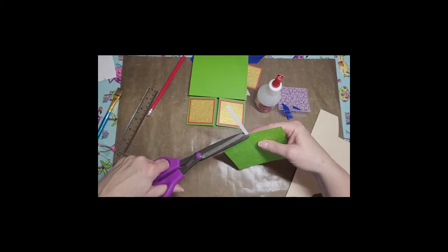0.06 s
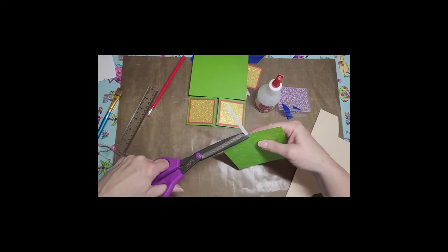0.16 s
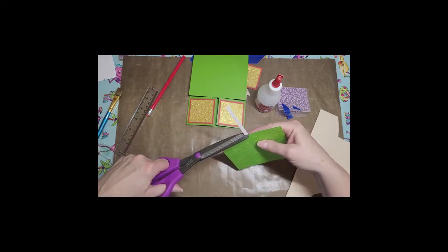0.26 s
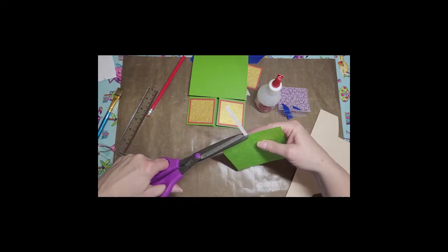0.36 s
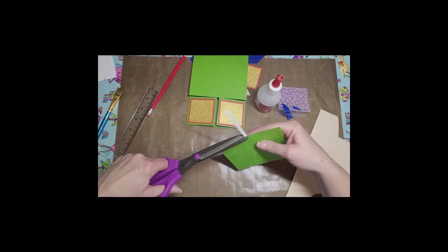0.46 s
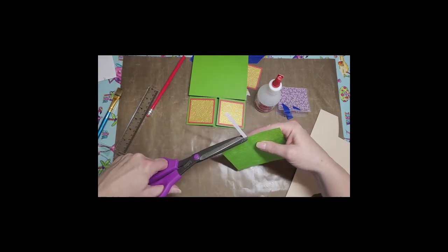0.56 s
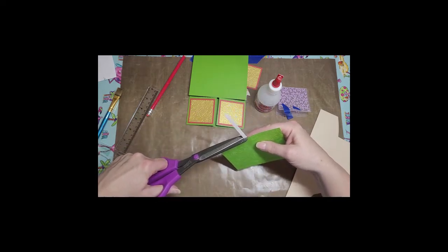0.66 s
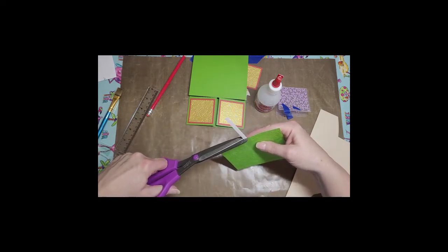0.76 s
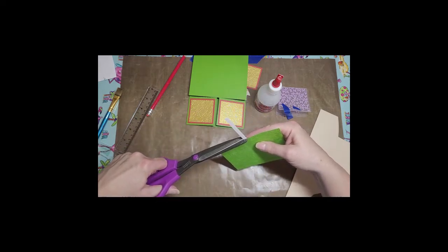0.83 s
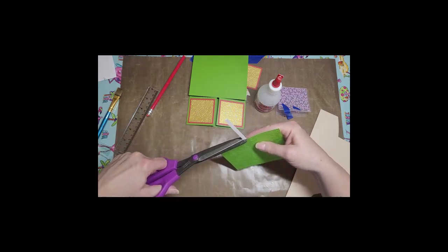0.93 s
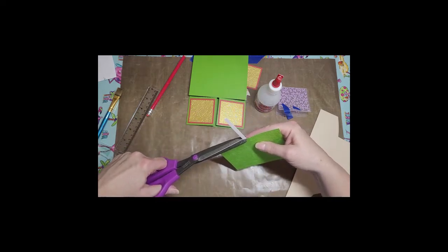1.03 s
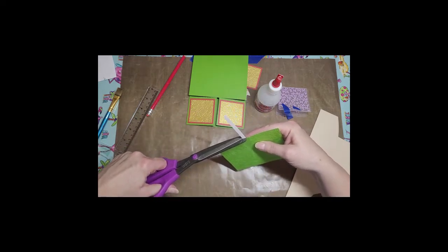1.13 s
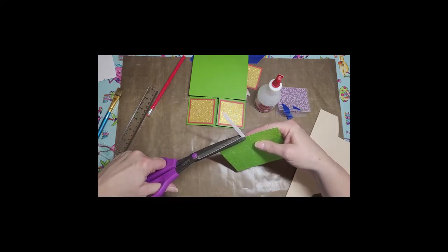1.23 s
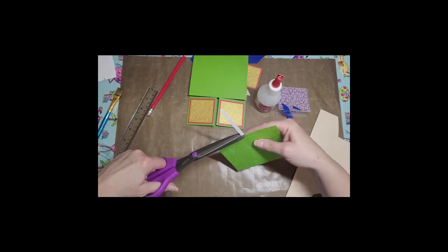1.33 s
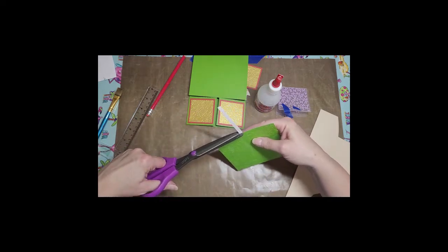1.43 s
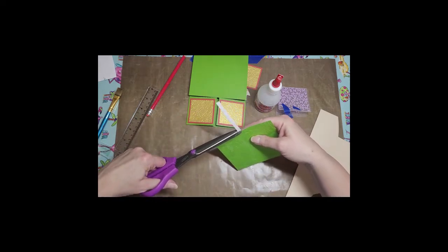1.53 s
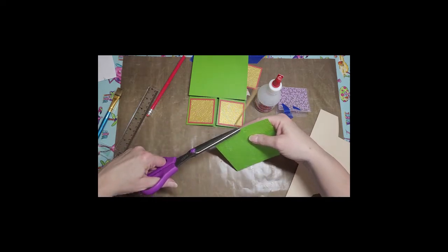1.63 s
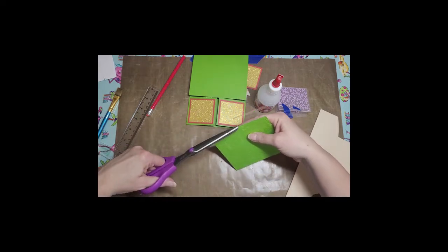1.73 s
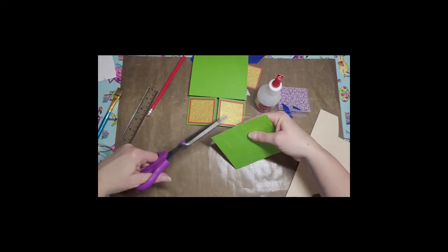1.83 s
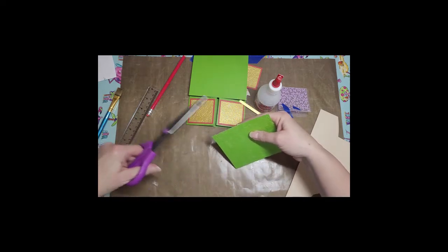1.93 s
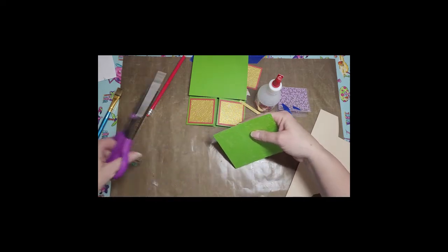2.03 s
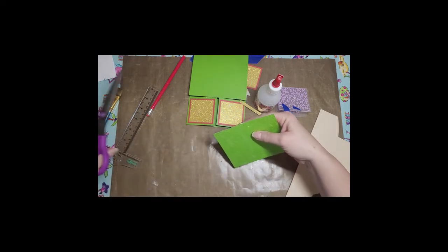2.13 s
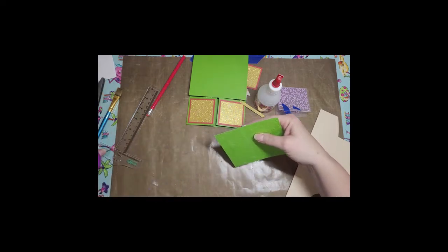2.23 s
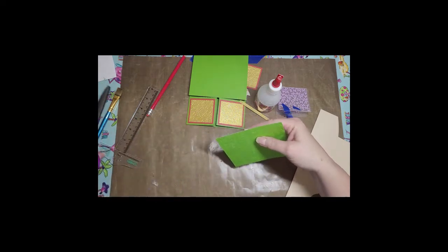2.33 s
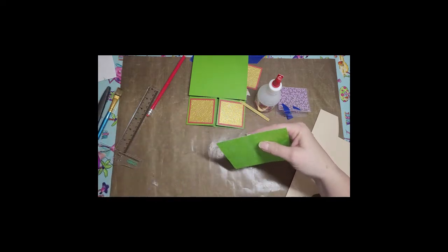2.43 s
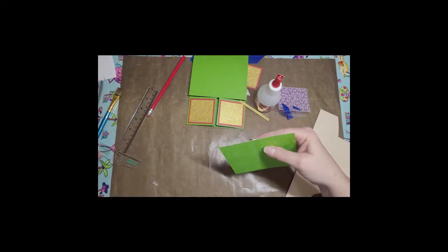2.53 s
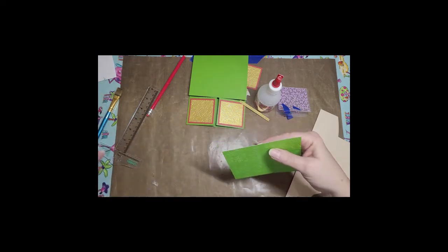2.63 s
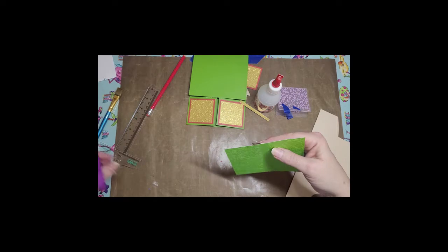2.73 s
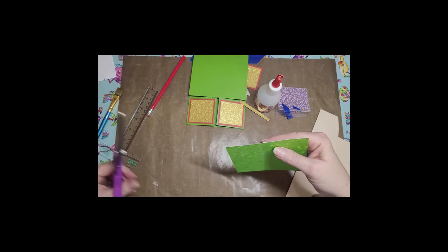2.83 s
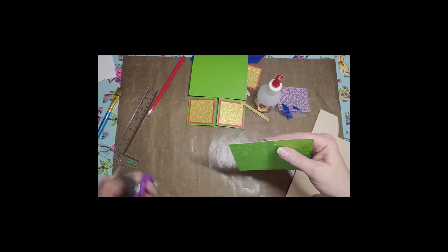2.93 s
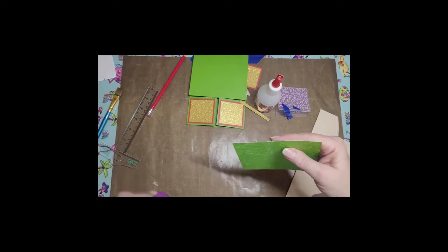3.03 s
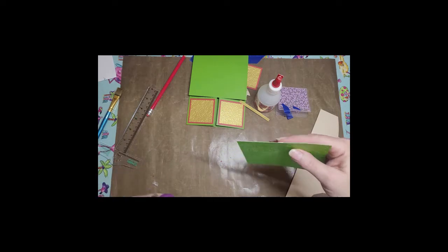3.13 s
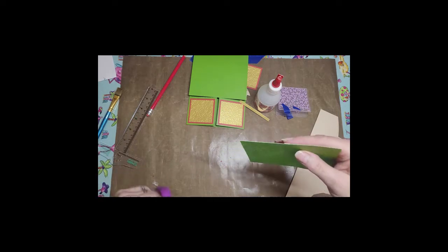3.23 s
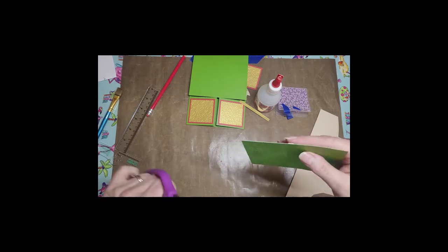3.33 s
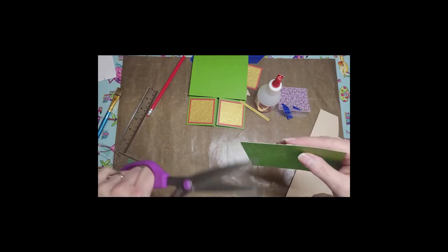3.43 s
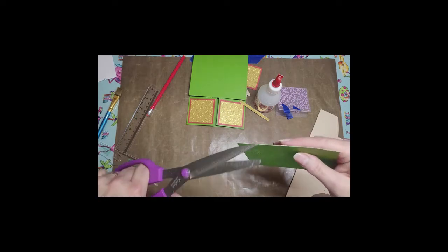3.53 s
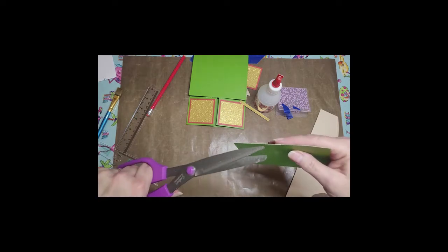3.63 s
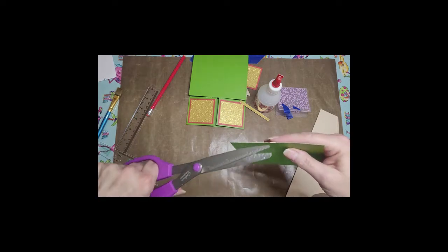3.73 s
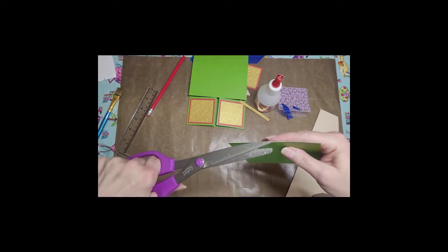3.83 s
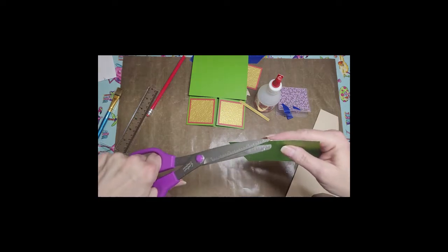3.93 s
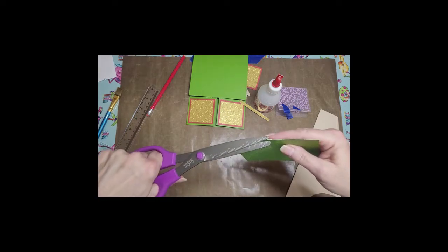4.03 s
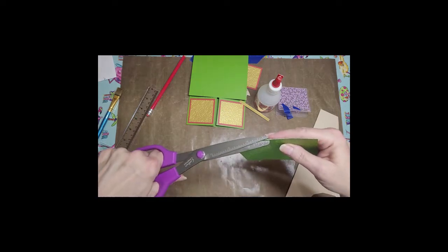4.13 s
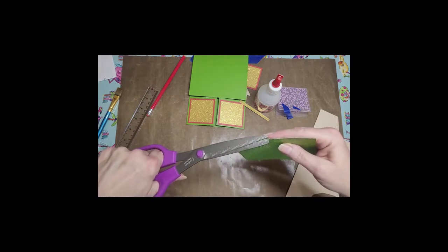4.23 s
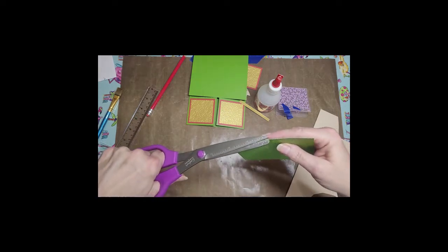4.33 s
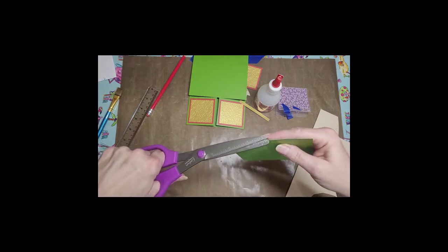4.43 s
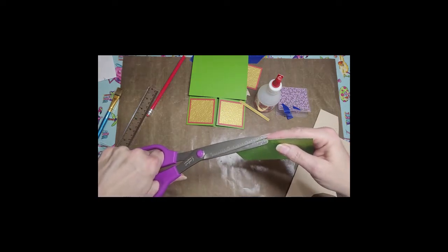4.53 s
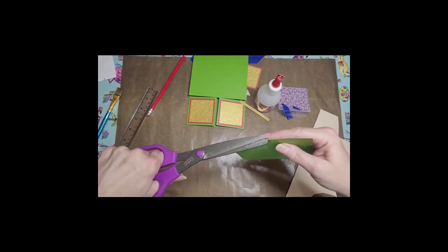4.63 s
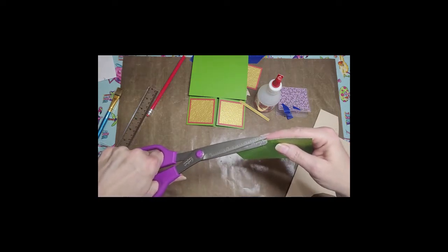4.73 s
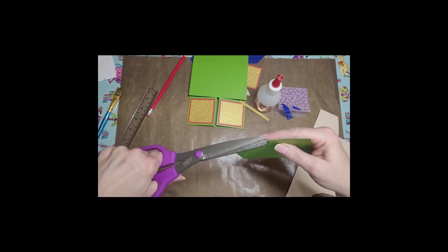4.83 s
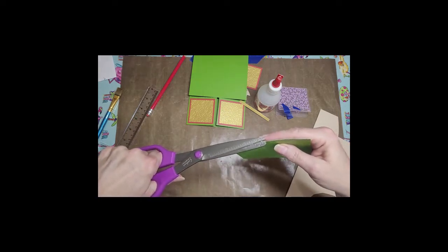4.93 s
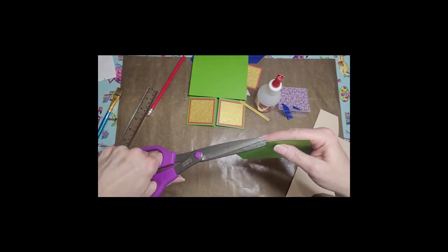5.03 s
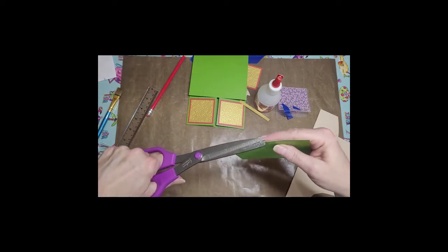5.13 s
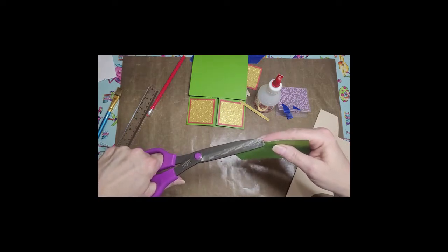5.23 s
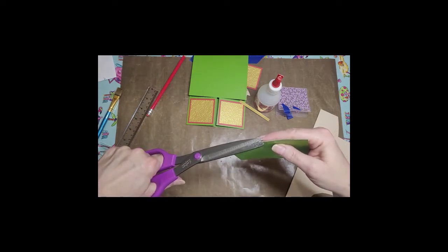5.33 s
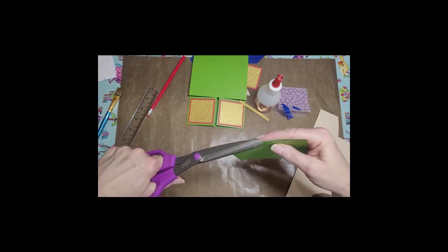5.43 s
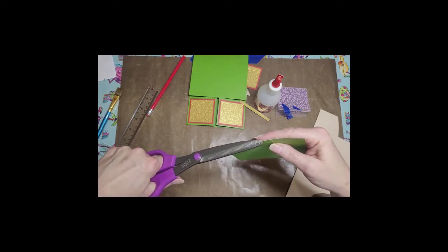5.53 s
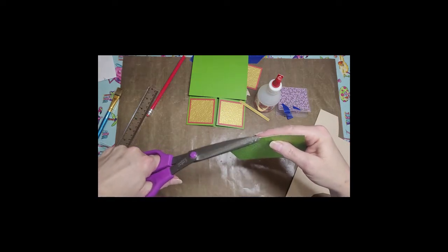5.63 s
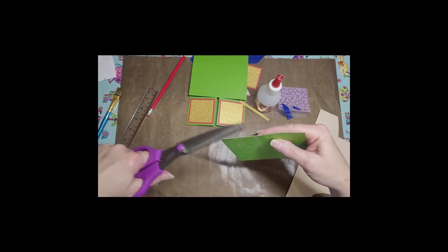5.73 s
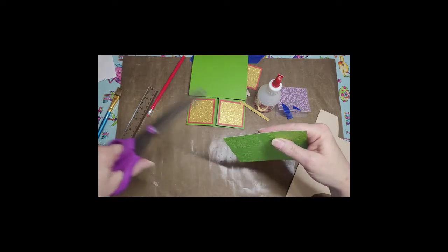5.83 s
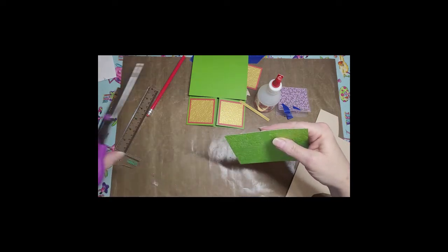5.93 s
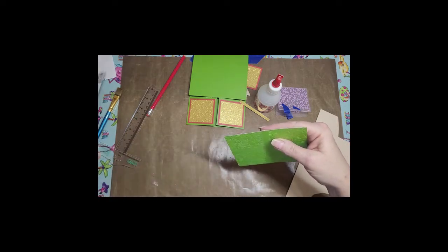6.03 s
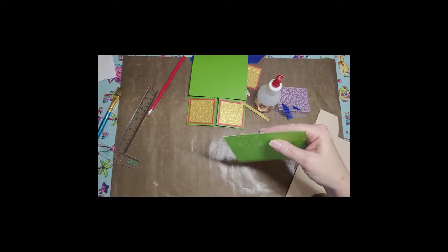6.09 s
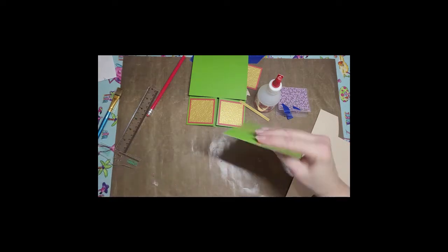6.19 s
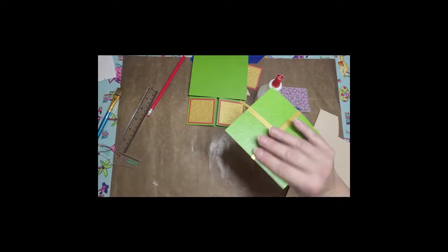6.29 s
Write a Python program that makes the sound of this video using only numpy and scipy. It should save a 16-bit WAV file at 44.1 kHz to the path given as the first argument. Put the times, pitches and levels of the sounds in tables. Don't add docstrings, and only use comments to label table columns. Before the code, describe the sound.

Two loud, steely scissor snips through stiff card, separated by a low table knock and dry card flicks, in a quiet hard-walled room.

```python
import sys
import numpy as np
from scipy import signal
from scipy.fft import rfft, irfft, next_fast_len
from scipy.io import wavfile
from scipy.ndimage import uniform_filter1d

SR = 44100
rng = np.random.default_rng(int(sys.argv[2]) if len(sys.argv) > 2 else 0)


def ratio(d):
    e = np.asarray(d, float) / 20
    return 10 ** e


def inscribe(sig):
    pcm = np.round(np.clip(np.atleast_2d(sig).T, -1, 1) * 32767)
    wavfile.write(sys.argv[1], SR, pcm.astype(np.int16))


N = 280460
TIME = np.arange(N) / SR

# (time [s], bright level [dB], middle over bright [dB], room level [dB])
SNIPS = [
    (1.5796, -7.5, -10.5, 1.5),
    (1.8345, -37.5, -11.5, 1.5),
    (5.4583, -10, -5, -4),
    (5.5466, -50, -9, -11),
]
OFFCUT = [(1.8477, -39, 7.5, -6.5), (1.8547, -56.5, 20, -7), (1.865, -62, 15.5, -6.5),
          (1.899, -40.5, -10, -7), (1.9466, -42.5, -5.5, -5), (2.015, -57.5, -10.5, 0.5),
          (5.576, -65.5, 6, -1)]
LAID = [
    (2.343, -63.5, -14, -6.5),
    (2.3768, -43, -6.5, -0.5),
    (2.4058, -57, -0.5, -0.5),
    (2.4182, -42, -10.5, -10),
]
FLICKS = [(2.685, -52.5, -3.5, -6), (2.726, -49, -25, -11), (2.91, -53, -16, 7), (2.9553, -56, -18.5, -16),
          (3.255, -56.5, -3, 1), (3.333, -44, -25, -9), (3.336, -37.5, -34, -19),
          (3.5373, -64.5, -9.5, -9.5), (5.909, -68, -12, -3.5)]
GRIPS = [(4.1253, -78.5, -3, -1), (4.161, -68.5, -5, 1), (4.2087, -74.5, -8, -5), (4.3827, -75, 0, 0.5),
         (6.1834, -68, -11.5, 8.5)]
DROPPED = [
    (6.2952, -45.5, -6.5, -9),
    (6.328, -53, -6.5, -4.5),
    (6.344, -54, -8.5, -8),
]
# (dull over middle [dB], dull pitch [Hz])
THING_BOOM = [
    (-11.5, 2400),
    (-5.5, 2930),
    (2, 1100),
    (-16.5, 810),
    (5, 930),
    (-27, 760),
]

# (pitch [Hz], width [Hz], level [dB])
BLADE_MODES = [(1870, 340, -5.5), (2650, 250, -2), (4700, 130, -4), (6660, 350, -8), (7500, 200, 3.5),
               (9560, 490, 4.5), (11360, 600, 1), (13935, 700, 0.5)]
# (frequency [Hz], level [dB per Hz])
CARD_COLOUR = [(290, -51), (500, -21), (710, -24.5), (1050, -12.5), (1480, -15.5), (2610, -16.5),
               (3250, -14), (4830, -8), (5350, -9.5), (6760, -3), (8300, -10), (9330, -9), (11600, -0.5),
               (15100, 1.5), (16500, -25.5)]
# (low edge [Hz], high edge [Hz])
BANDS = [(8600, 20000), (3400, 8600), (250, 3400)]
# (frequency [Hz], time to fall 60 dB [s])
WALLS = [(100, 0.5), (500, 0.24), (1200, 0.2), (4000, 0.24), (10000, 0.22), (16000, 0.16)]

# (peak time [s], peak level [dB], rise [dB/s], fall [dB/s], middle over bright [dB])
SHEARS = [(1.26, -82, 300, 170, -16), (1.366, -79.5, 152, 15, -13.5), (1.534, -60, 403, 898, -21),
          (1.569, -48, 1200, 1502, -15.5), (5.424, -74.5, 129.5, 600, -11.5),
          (5.447, -49, 1150, 1500, -20.5)]
SLIDES = [(2.645, -68, 120, 146, -6.5), (2.686, -62.5, 3000, 590, 7), (2.722, -63, 900, 166, -10.5),
          (2.912, -60, 3000, 220, -13.5), (2.942, -54, 500, 520, -17.5), (2.99, -66.5, 300, 28, -12.5),
          (3.26, -54, 920, 245, -10.5), (3.334, -60, 1000, 900, -14.5), (3.356, -76.5, 400, 104, -16),
          (3.544, -77.5, 150, 79, -9), (5.998, -77, 44.8, 91, -10.5), (6.136, -77.5, 400, 460, -9),
          (6.196, -72, 800, 8, 0)]
FIDGETS = [(4.126, -89, 900, 540, -10), (4.162, -87, 1700, 260, -4), (5.2, -94, 690, 120, -5),
           (5.8, -85, 78, 130, -40), (7.2, -83.5, 93, 20, -34)]
STROKE_DULL_DB = [-5.5, -9.5, 17]

# (time [s], peak level [dB], pitch [Hz], room level [dB])
CREAKS = [(0.167, -69.5, 7290, 13), (0.1857, -70.5, 7400, 8), (0.4279, -70.5, 7320, 15),
          (1.947, -53.5, 7350, -5.5), (2.0153, -67.5, 7420, 4.5), (2.1211, -65, 7400, 9.5),
          (4.1589, -70, 6940, 9), (4.1814, -75.5, 6770, 7.5)]
TAPS = [(1.947, -44, 4500, -3.5), (2.377, -42, 5300, -3), (2.406, -39.5, 4600, -2),
        (2.4169, -48, 4700, -11), (3.335, -52, 4990, -11), (6.2948, -47, 5130, 4), (6.327, -50, 4940, -5.5),
        (6.3455, -52.5, 4490, -6)]
BOOMS = [(1.58, -46, 370, -2), (1.58, -39, 1050, 3), (1.8478, -60, 330, -3), (1.85, -46, 1750, 8),
         (2.6845, -67, 1000, 7), (4.1253, -73, 600, -1), (4.1606, -74.5, 1150, -3), (4.3818, -69, 600, 0),
         (5.4582, -56, 330, -3.5), (5.4582, -38.5, 2660, 2.5), (5.575, -62.5, 1090, -3),
         (5.4582, -35, 3900, -3), (1.58, -50, 1770, 4), (2.6845, -61.5, 2700, 0.5),
         (6.186, -73.5, 550, 5.5)]

# (time [s], peak level [dB])
KNOCKS = [(1.578, -56), (2.374, -29.5), (2.389, -33.5), (2.406, -34), (2.417, -36), (5.457, -58.5),
          (6.293, -37.5), (6.31, -42.5), (6.328, -40.5), (6.345, -46)]
# (pitch [Hz], level [dB], time to fall 60 dB [s])
TABLE_MODES = [(62, -9, 0.38), (100, -11, 0.2), (128.45, -2, 0.18), (187, -8.5, 0.16), (237.3, -1.5, 0.34),
               (313, -4.5, 0.15), (610, -19.5, 0.13)]
# (frequency [Hz], level [dB per Hz])
THUD_COLOUR = [(35, -39.5), (60, -10), (117, 1), (237, -7.5), (401, -22.5), (603, -13.5), (810, -24.5),
               (879, -44), (1110, -30.5), (3000, -54), (3900, -76), (6600, -120)]
# (time [s], peak level [dB])
SWAYS = [
    (2.4, -53),
    (6.3, -51.5),
    (6.33, -44),
]

# (time [s], pitch [Hz], level [dB])
GROAN = [(2.53, 132.1, -78), (2.58, 141.4, -74.5), (2.82, 147.6, -73), (2.92, 141.5, -68.5),
         (2.96, 141, -79.5), (3.2, 133, -78), (3.24, 133, -83), (3.46, 140.4, -87)]
# (peak time [s], peak level [dB], rise [dB/s], fall [dB/s])
DRAG = [(2.56, -71, 59.5, 40.5), (2.714, -70, 199, 228), (2.87, -72, 302, 98)]
# (time [s], pitch [Hz], level [dB])
SQUEAK = [(2.12, 1497, -100), (2.3, 1520, -74.5), (2.38, 1504, -82), (2.486, 1484, -83.5),
          (2.6, 1514, -100)]

# (frequency [Hz], level [dB per Hz])
AIR_COLOUR = [(15, -36), (25, -9.5), (54, 0), (208, -14.5), (237, -6), (264, -11), (301, -3.5), (335, -15),
              (425, -12), (511, -18), (1230, -26), (1560, -26.5), (7610, -33.5), (14000, -28)]
# (frequency [Hz], likeness [-1 to 1])
ALIKE = [(60, 0.58), (180, 0.76), (550, 0.25), (1650, -0.16), (4970, -0.02), (15000, -0.14)]
HUM_HZ = [48.4, 241, 11908]
# (width [Hz], level [dB])
HUM = [(18.93, -86), (5.95, -90), (25, -104)]


def unit(x):
    return x / np.sqrt(np.mean(x ** 2, axis=-1, keepdims=True) + 1e-20)


def along(points, hz):
    point_hz, value = np.transpose(points)
    return np.interp(np.log(hz + 1), np.log(point_hz + 1), value)


def filtered(x, response):
    n = x.shape[-1]
    padded = next_fast_len(n + 8192)
    hz = np.fft.rfftfreq(padded, 1 / SR)
    return irfft(rfft(x, padded) * response(hz), padded)[..., :n]


def peak(hz, centre_hz, width_hz):
    push = 1j * hz * width_hz
    return push / (centre_hz ** 2 - hz ** 2 + push)


def add(track, s, x):
    part = track[:, round(s * SR):]
    part[:, :x.shape[1]] += x[:, :part.shape[1]]


def level_curve(s, db):
    fade = np.clip(np.minimum(TIME - s[0], s[-1] + 0.018 - TIME) / 0.026, 0, 1)
    return fade * ratio(np.interp(TIME, s, db))


def stroke(s, db, rise, fall):
    return ratio(db - np.where(TIME < s, rise * (s - TIME), fall * (TIME - s)))


def room(x, gap_s=.003, stretch=1):
    hz, t, z = signal.stft(rng.standard_normal((2, SR // 2)), SR, nperseg=256)
    fall = ratio(-60 * t / stretch / along(WALLS, hz)[:, None])
    tail = signal.istft(z * fall, SR, nperseg=256)[1]
    tail = tail * (1 - np.exp(-np.arange(tail.shape[1]) / SR / gap_s))
    return signal.fftconvolve(np.atleast_2d(x), tail / np.linalg.norm(tail[0]), axes=1)


def banded(x):
    def colour(hz):
        steel = 1 + sum(ratio(db) * np.abs(peak(hz, c, w)) ** 2 for c, w, db in BLADE_MODES)
        return ratio(along(CARD_COLOUR, hz)) * steel

    def band(hz, low, high):
        return 1 / (1 + (low / (hz + 1)) ** 10) / (1 + (hz / high) ** 10)

    return [filtered(x, lambda hz: colour(hz) * band(hz, low, high)) for low, high in BANDS]


def snap(out, s, bright_db, tilt_db, room_db, boom_db, dull_hz):
    start_s, left_lag, onset_s = .004, 2, 0.00045
    t = np.arange(1024) / SR - start_s
    pulse = 1. * (np.arange(len(t)) == np.argmax(t >= 0))
    own, shared = rng.standard_normal((2, len(t))), rng.standard_normal(len(t))
    noise = .8 * own + np.array([np.roll(shared, left_lag), shared])
    crack = noise * (t >= 0) * (ratio(-60 * t / 0.0086) + .12 * ratio(-60 * t / .03))
    bright, middle, dull = banded(np.vstack([crack, pulse]))
    dull = filtered(dull, lambda hz: .55 + np.abs(peak(hz, dull_hz, .6 * dull_hz)))

    middle_db = bright_db + tilt_db
    levels = ratio([bright_db + 4, middle_db + 3, middle_db + boom_db + .5])
    parts = [g * b / np.abs(b[1]).max() for g, b in zip(levels, (bright, middle, dull))]
    onset = np.exp(np.minimum(t, 0) / onset_s)
    add(out, s - start_s, sum(parts)[:2] * onset * ratio([[.8], [2.8]]))

    even = sum(ratio(db) * b[2] * np.linalg.norm(b[1]) / np.linalg.norm(b[2])
               for db, b in zip((-1.6, 1.2, 3.2), parts))
    add(out, s - start_s, ratio(room_db + 1) * room(even))


def snaps():
    out = np.zeros((2, N))
    things = (SNIPS, OFFCUT, LAID, FLICKS, GRIPS, DROPPED)
    for hits, (boom_db, dull_hz) in zip(things, THING_BOOM):
        for hit in hits:
            snap(out, *hit, boom_db, dull_hz)
    return out


def rubs():
    unevenness = ratio(4.1 * unit(uniform_filter1d(rng.standard_normal(N), 40)))
    grains = rng.standard_normal((2, N)) * unevenness
    level = np.zeros((3, N))
    for strokes, dull_db in zip((SHEARS, SLIDES, FIDGETS), STROKE_DULL_DB):
        for s, db, rise, fall, middle_db in strokes:
            level += stroke(s, db, rise, fall) * ratio([[0], [middle_db], [middle_db + dull_db]])
    direct = sum(g * ratio(-5.5) * unit(b) for g, b in zip(level, banded(grains)))
    return direct * ratio([[-1.5], [1.5]]) + ratio(-7.5) * room(direct[0])[:, :N]


def pings(rows, width_hz, low_db):
    out, t = np.zeros((2, N)), np.arange(2048) / SR
    for s, db, ring_hz, room_db in rows:
        slip = rng.standard_normal(len(t)) * ratio(-60 * t / 0.008)
        ring = filtered(slip, lambda hz: peak(hz, ring_hz, width_hz) - ratio(low_db) * peak(hz, 1860, 180))
        ring = ratio(db - 3) * ring / np.abs(ring).max()
        add(out, s, np.array([ring, ring]))
        add(out, s, ratio(room_db - 1) * room(ring))
    return out


def knocks():
    out, t = np.zeros((2, N)), np.arange(SR // 2) / SR
    sides = np.array([[1], [-1]])
    onset = 1 - np.exp(-t / 0.00085)
    for s, db in KNOCKS:
        ring = 0
        for (hz, mode_db, t60), luck in zip(TABLE_MODES, rng.standard_normal((len(TABLE_MODES), 3))):
            gain = ratio(mode_db + 2.1 * luck[0] - 60 * t / t60)
            ring = ring + gain * np.sin(2 * np.pi * hz * t + 3 * luck[1] + 0.2 * luck[2] * sides)
        noise = rng.standard_normal(len(t)) + 0.3 * rng.standard_normal((2, len(t)))
        thud = unit(filtered(noise, lambda hz: ratio(along(THUD_COLOUR, hz)))) * ratio(1 - 60 * t / .2)
        add(out, s + 0.0032, ratio(db - 9) * (ring + thud) * onset * ratio([[-.8], [.8]]))
    return out


def sway():
    sway_hz, t60_s, rise_s = 56, .5, 0.0089
    out, t = np.zeros((2, N)), np.arange(SR // 2) / SR
    rock = (1 - np.exp(-t / rise_s)) * np.sin(2 * np.pi * sway_hz * t) * np.ones((2, 1))
    for s, db in SWAYS:
        add(out, s, ratio(db - 60 * t / t60_s) * rock)
    return out


def drag():
    s, hz, db = np.transpose(GROAN)
    turn = 2 * np.pi * np.cumsum(np.interp(TIME, s, hz)) / SR
    groan = 1.55 * level_curve(s, db) * np.sin(turn + np.array([[.3], [-.3]]))
    noise = rng.standard_normal(N) + 1.2 * rng.standard_normal((2, N))
    friction = unit(filtered(noise, lambda f: peak(f, 236, 30) ** 2))
    return groan + sum(stroke(*row) for row in DRAG) * friction


def squeak():
    s, hz, db = np.transpose(SQUEAK)
    slow = uniform_filter1d(rng.standard_normal((2, 2, N)), size=230)
    fuzz = unit(uniform_filter1d(slow, size=230))
    turn = 2 * np.pi * np.cumsum(np.interp(TIME, s, hz)) / SR
    tone = (fuzz[0] + 0.33) * np.sin(turn) + fuzz[1] * np.cos(turn)
    return level_curve(s, db) * ratio(3.5) * tone


def whine():
    centre_hz, span_hz, sweep_hz, skirt_hz = 15030, 200, 16.78, 15200
    drift = 0.5 * unit(uniform_filter1d(rng.standard_normal(N), 1500))
    sweep = span_hz / sweep_hz * np.sin(2 * np.pi * sweep_hz * TIME + 5.7)
    tone = np.sin(2 * np.pi * centre_hz * TIME + sweep + drift)
    early = np.pad(tone, (SR // 2, 0), "reflect")
    heard = room(early, stretch=2.6)[:, SR // 2:][:, :N]
    heard = unit(filtered(heard, lambda hz: ratio((hz - centre_hz) / 120) * (np.abs(hz - centre_hz) < 3 * span_hz)))
    skirt = unit(filtered(rng.standard_normal((2, N)), lambda hz: peak(hz, skirt_hz, 1000) ** 4))
    return ratio([[-60], [-63]]) * heard + ratio(-78) * skirt


def air():
    def mid_and_side(hz):
        turn = np.arccos(np.clip(along(ALIKE, hz), -1, 1)) / 2
        return ratio(along(AIR_COLOUR, hz)) * np.array([np.cos(turn), np.sin(turn)])

    mid, side = filtered(rng.standard_normal((2, N)), mid_and_side)
    tones = np.zeros(N)
    for tone_hz, (width_hz, db) in zip(HUM_HZ, HUM):
        noise = rng.standard_normal(N)
        tones += ratio(db) * unit(filtered(noise, lambda hz: peak(hz, tone_hz, width_hz) ** 2))
    return ratio(-77.5) * unit(np.array([mid + side, mid - side])) + tones


def scene():
    creaks = pings(CREAKS, width_hz=800, low_db=-3.5)
    taps = pings(TAPS, width_hz=750, low_db=-44)
    booms = pings(BOOMS, width_hz=160, low_db=-40.5)
    scissors_and_card = snaps() + rubs() + creaks + taps + booms
    table = knocks() + sway() + drag() + squeak()
    return scissors_and_card + table + whine() + air()


def top_cut(x):
    return signal.sosfilt(signal.butter(12, 17140, fs=SR, output="sos"), x)


def record(dry):
    top_hz, end_hz, bass_hz = 15790, 16900, 28

    def below(hz):
        return np.clip((top_hz - hz) / 80 + .5, 0, 1)

    body = filtered(dry, lambda hz: below(hz) * hz ** 2 / (hz ** 2 + bass_hz ** 2))
    top = filtered(dry, lambda hz: (1 - below(hz)) * (hz < end_hz))
    now = np.abs(uniform_filter1d(top ** 2, size=130))
    nearby = np.abs(uniform_filter1d(top ** 2, size=2000)) + 1e-14
    gate = uniform_filter1d(np.clip(now / nearby / 4 - 1, .03, 1), size=130)
    mix = np.clip(body + ratio(-3) * gate * top, -.88, .88)
    return top_cut(mix)


dry = scene()
out = record(dry)
inscribe(out)
```